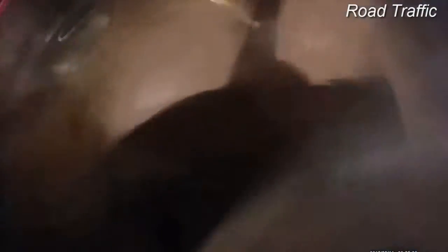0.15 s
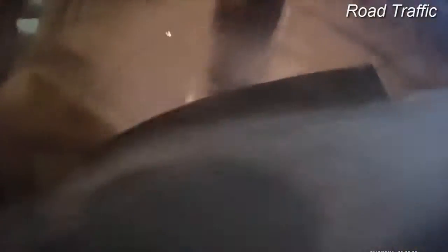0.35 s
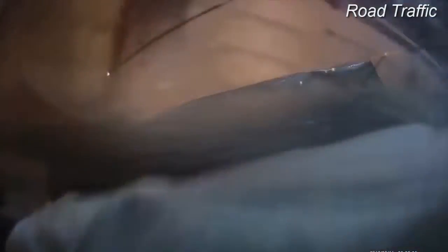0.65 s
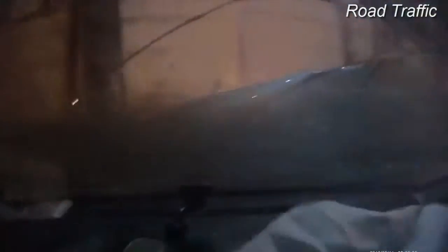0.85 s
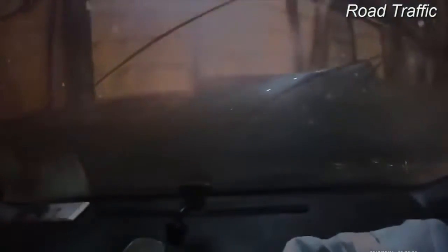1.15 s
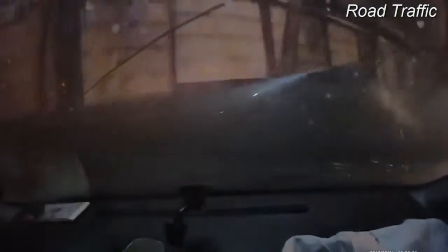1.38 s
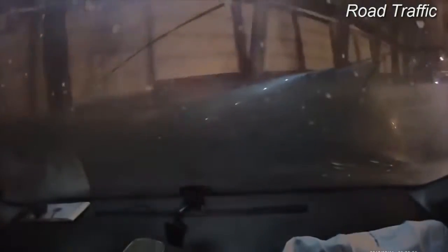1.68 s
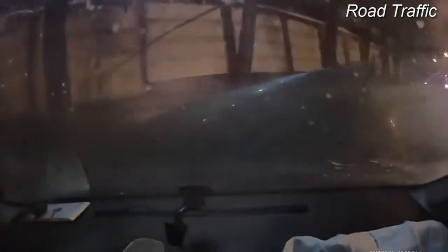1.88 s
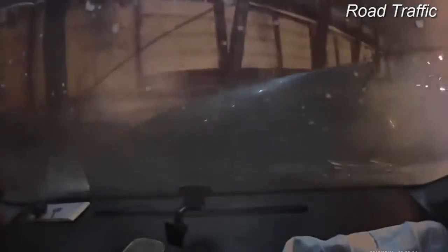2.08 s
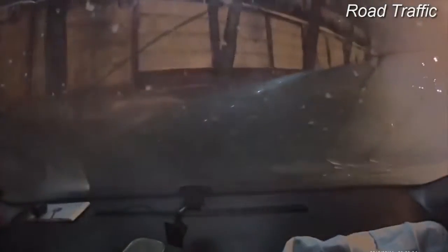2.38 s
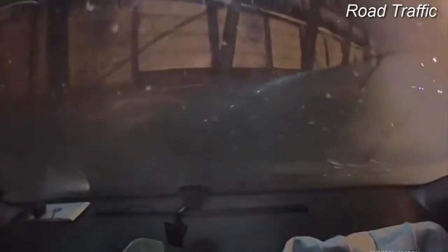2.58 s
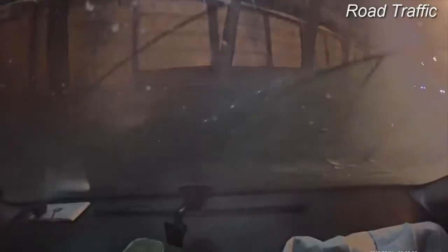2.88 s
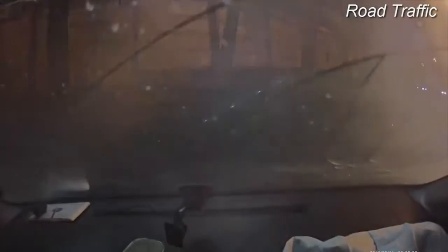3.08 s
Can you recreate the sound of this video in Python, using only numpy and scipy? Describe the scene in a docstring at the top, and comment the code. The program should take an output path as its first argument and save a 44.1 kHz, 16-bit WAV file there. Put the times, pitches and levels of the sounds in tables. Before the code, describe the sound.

A car slams into a wall with a heavy crunch and overloaded roar, debris rattling down to quiet hissing

```python
"""A car hits a wall, heard in the cabin: the shell booms and panels crumple (shaped noise, decaying sines);
glass crumbs and debris rain down (gritty noise, short pings) and loose parts strike (noise bursts).
The airbag blast (a noise roar) overloads the input; trim pieces knock (short sines) as the din dies.
A faint steam hiss (coloured noise) grows and brightens, the stalling engine shudders (mount resonances),
then little but the steam is left."""
import sys
import numpy as np
from scipy import signal
from scipy.fft import rfft, irfft, next_fast_len
from scipy.io import wavfile

SR = 44100
rng = np.random.default_rng(int(sys.argv[2]) if len(sys.argv) > 2 else 0)


def log_audio(samples):
    """Write samples as a 16-bit WAV file to the path given in sys.argv[1]."""
    # one column per channel
    frames = np.atleast_2d(samples).T
    # limit to full scale, then quantise
    limited = np.clip(frames, -1, 1)
    pcm = np.round(limited * 32767).astype(np.int16)
    wavfile.write(sys.argv[1], SR, pcm)


N = 143325


def amp(db):
    """Decibels to amplitude factor."""
    return 10 ** (np.asarray(db) / 20)


def unit(x):
    """Scale to rms 1."""
    return x / np.sqrt(np.mean(x ** 2) + 1e-20)


def curves(rows, dies_db_per_s=0):
    """Per-sample curve of each column after the time, falling steadily after the last row."""
    time_s, *columns = np.transpose(rows)
    t = np.arange(N) / SR
    fall_db = dies_db_per_s * np.clip(t - time_s[-1], 0, None)
    return [np.interp(t, time_s, column) - fall_db for column in columns]


def coloured(x, points):
    """Filter x by (frequency [Hz], gain [dB]) points, log-interpolated in frequency; rms 1."""
    m = next_fast_len(N + 8192)
    hz, db = np.transpose(points)
    bins_hz = np.fft.rfftfreq(m, 1 / SR)
    gain = amp(np.interp(np.log(bins_hz + 1), np.log(hz + 1), db, left=-90, right=-90))
    return unit(irfft(rfft(x, m) * gain, m)[:N])


def gritty(rate_per_s, spread_db, t60_s, bed):
    """Noise broken into small decaying impacts of random size, over a steady bed."""
    sizes = amp(spread_db * rng.exponential(size=N))
    ticks = (rng.random(N) < rate_per_s / SR) * sizes
    t = np.arange(SR // 10) / SR
    grains = unit(signal.fftconvolve(ticks, amp(-60 * t / t60_s))[:N])
    return (bed + grains) * rng.standard_normal(N)


def band(x, lo_hz, hi_hz):
    """Butterworth band-pass."""
    return signal.sosfilt(signal.butter(2, [lo_hz, hi_hz], "band", fs=SR, output="sos"), x)


def highpass(order, cutoff_hz):
    """Butterworth high-pass sections."""
    return signal.butter(order, cutoff_hz, "high", fs=SR, output="sos")


def add_at(out, start_s, sound):
    """Mix a sound into out at its start time."""
    out[round(start_s * SR):][:len(sound)] += sound


# shell shaking: (time [s], boom level [dB], rumble level [dB])
SHELL_SHAKE = [(0, -24, -24.5), (.1, -25.5, -20.5), (.3, -36.5, -36), (.6, -27, -34.5), (.75, -33, -34.5),
               (.82, -34.5, -40), (1.1, -41.5, -41.5), (1.45, -47.5, -44.5), (1.6, -40, -44),
               (1.95, -43, -47), (2.3, -35.5, -39), (2.68, -45, -48), (2.78, -45.5, -57.5),
               (3.25, -68, -64.5)]
# boom and rumble spectra: (frequency [Hz], relative density [dB per Hz])
BOOM_SPECTRUM = [(15, 3), (30, 5.5), (47, 8), (62, 7), (85, -20)]
RUMBLE_SPECTRUM = [(50, -26), (80, 8), (140, 6), (220, 3), (320, -13)]
# heavy blows to the shell: (time [s], peak level [dB])
SHELL_BLOWS = [(0.0142, -14), (0.093, -12), (.214, -19.5), (0.258, -23), (0.719, -19.5), (1.085, -29)]
# shell modes: (frequency [Hz], relative level [dB], t60 [s], swell [s])
SHELL_MODES = [(46.3, 0.5, 0.21, 0.015), (286, -9, .05, 0.0036)]


def shell():
    """The body shakes in its lowest resonance and rumbles above it; heavy blows set it ringing."""
    out, t = np.zeros(N + SR), np.arange(SR // 2) / SR
    ring = np.zeros(len(t))
    for hz, db, t60_s, swell_s in SHELL_MODES:
        envelope = amp(db - 60 * t / t60_s) * (1 - np.exp(-t / swell_s))
        ring += envelope * np.sin(2 * np.pi * hz * t)
    ring /= np.abs(ring).max()
    for s, db in SHELL_BLOWS:
        add_at(out, s, amp(db) * ring)
    boom_db, rumble_db = curves(SHELL_SHAKE)
    boom = amp(boom_db) * coloured(rng.standard_normal(N), BOOM_SPECTRUM)
    rumble = amp(rumble_db) * coloured(rng.standard_normal(N), RUMBLE_SPECTRUM)
    return out[:N] + boom + rumble


# crumpling and rattling panels, raining glass: (time [s], level [dB])
CRUMPLE_LEVEL = [(0, -33.5), (.036, -32), (.07, -19), (.3, -34.5), (.46, -34), (.5, -26.5), (.58, -35),
                 (.63, -25.5), (.72, -35.5), (.8, -37.5), (1.3, -49), (2.4, -49.5), (2.75, -57)]
GLASS_RAIN_LEVEL = [(.03, -57.5), (.1, -32.5), (.3, -45.5), (.58, -54), (.7, -39), (.8, -52), (1.2, -61.5),
                    (1.5, -70.5)]
# their spectra: (frequency [Hz], relative density [dB per Hz])
CRUNCH_SPECTRUM = [(180, -19), (330, 3.5), (600, -1.5), (1200, -5), (1550, -7.5), (2000, -29), (3000, -30)]
SHOWER_SPECTRUM = [(1300, -21), (2300, 4.5), (3200, -5.5), (4500, -0.5), (6000, -6.5), (9000, -8.5),
                   (16000, -20)]
DIES_DB_PER_S = 17  # after the last level row


def debris():
    """Many small impacts: crumpling plastic and sheet metal below, glass crumbs above."""
    crunch_db, = curves(CRUMPLE_LEVEL, DIES_DB_PER_S)
    shower_db, = curves(GLASS_RAIN_LEVEL, DIES_DB_PER_S)
    crunch = coloured(gritty(rate_per_s=80, spread_db=1.7, t60_s=0.039, bed=1.0), CRUNCH_SPECTRUM)
    shower = coloured(gritty(rate_per_s=700, spread_db=4.5, t60_s=0.016, bed=0.68), SHOWER_SPECTRUM)
    return amp(crunch_db) * crunch + amp(shower_db) * shower


# loose parts striking:
# (time [s], level [dB], thud gain over it [dB], sparkle gain over it [dB], crack and sparkle t60 [s])
PART_HITS = [(0.047, -18, -20, -13, 0.28), (0.4147, -29.5, 12, -21, 0.046), (0.435, -15, -7.5, -23, 0.02),
             (0.511, -41, 17, -3, 0.16), (0.5485, -30, 11, -5, 0.015), (0.6145, -24.5, 2.5, 2, 0.067),
             (0.645, -24.5, -8, -5.5, 0.12), (0.6941, -31, 10, 7, 0.053), (0.73, -29, 7, -4, 0.062),
             (0.843, -28, -17, -5, 0.1), (1.0031, -21.5, -17, -7, 0.086), (1.0382, -46, 19.5, -15, 0.033),
             (1.0998, -36, 3.5, -3.5, 0.12), (1.2606, -22, -4, -23, 0.055),
             (1.3189, -29.5, 4, -13.5, 0.073), (1.4071, -52.5, 12.5, 2.5, 0.22),
             (1.5497, -26.5, 9.5, -27, 0.035), (1.5604, -30.5, 11, -21, 0.016),
             (1.5694, -33, 12, -25, 0.039), (1.6125, -39, 1.5, -19, 0.16), (1.849, -37, -14, -5.5, 0.054)]
CONTACT, THUD_T60_RATIO = 3.4, 1.59


def parts():
    """Each strike: a hard first contact, then dying noise, sounding as crack, thud and sparkle."""
    out, t = np.zeros(N + SR), np.arange(SR // 5) / SR
    contact = CONTACT * (t == 0) * [[1], [.3], [2]]  # crack, sparkle, thud
    for s, db, thud_db, sparkle_db, t60_s in PART_HITS:
        a, b, c = rng.standard_normal((3, len(t))) * amp(-60 * t / t60_s) + contact
        crack = 0.68 * band(a, 1410, 2820)
        sparkle = amp(sparkle_db) * (band(b, 3580, 6350) + 0.33 * band(b, 5500, 10560))
        slower_decay_db = 60 * t / t60_s * (1 - 1 / THUD_T60_RATIO)
        thud = 3 * band(c * amp(thud_db + slower_decay_db), 328, 1184)
        add_at(out, s, amp(db) * (crack + sparkle + thud))
    return out[:N]


# glass crumbs pinging: (time [s], level [dB], ring frequency [Hz])
GLASS_PINGS = [(0.061, -19.5, 4370), (0.0842, -23, 4680), (0.232, -22.5, 7500), (0.307, -27.5, 4600),
               (0.323, -33, 5160), (1.166, -40.5, 5450), (1.2276, -36.5, 4640), (1.7677, -40.5, 4400)]
PING_T60_S, PING_WIDTH_RATIO = 0.026, 1.08


def glass():
    """A bright noise tick and a narrow-band short ring for each crumb."""
    out, t = np.zeros(N + SR), np.arange(SR // 10) / SR
    for s, db, hz in GLASS_PINGS:
        a, b = rng.standard_normal((2, len(t))) * amp(-60 * t / PING_T60_S)
        tick = 0.4 * band(a, 2300, 9500)
        ring = 2.0 * band(b, hz / PING_WIDTH_RATIO, hz * PING_WIDTH_RATIO)
        add_at(out, s, amp(db) * (tick + ring))
    return out[:N]


# gas roar spectrum: (frequency [Hz], relative density [dB per Hz])
BLAST_SPECTRUM = [(100, -12), (400, -1), (650, -0.5), (1100, 4.5), (1500, -5), (2600, -7.5), (5000, -13.5),
                  (16000, -30.5)]
BLAST_START_S, BLAST_ATTACK_S, BLAST_HOLD_S = 0.1085, 0.013, 0.072
BLAST_DB, BLAST_FALL_DB_PER_S = -2.5, 678  # level before the deepening


def airbag():
    """A roar of gas: fast attack, hold, steep fall; it deepens as the bag fills."""
    t = np.arange(N) / SR - BLAST_START_S
    fall_db = BLAST_FALL_DB_PER_S * np.clip(t - BLAST_ATTACK_S - BLAST_HOLD_S, 0, None)
    roar = coloured(rng.standard_normal(N), BLAST_SPECTRUM)
    fill = np.clip(t / BLAST_HOLD_S - .45, 0, 1)
    roar = roar + 1.67 * fill * band(roar, 585, 795)
    attack = np.clip(t / BLAST_ATTACK_S, 0, 1) ** 2
    return attack * amp(BLAST_DB - fall_db) * roar


# hard trim pieces struck: (time [s], level [dB], frequency [Hz])
TRIM_KNOCKS = [(0.269, -22.5, 2220), (0.377, -21.5, 1150), (0.413, -22, 1720), (.4345, -17.5, 1590),
               (0.484, -22.5, 870), (.602, -25, 610), (0.873, -23.5, 1180), (1.006, -17, 1350),
               (1.322, -21, 1110), (1.552, -27, 2880), (1.634, -31, 1100), (1.754, -31.5, 1280),
               (1.853, -38, 1290), (1.896, -39.5, 1430), (2.197, -35, 1380), (2.881, -35, 1050)]
TRIM_T60_S, TRIM_RISE_S = 0.02, 0.00042


def trim():
    """A short knock for each piece: one quickly damped sine."""
    out, t = np.zeros(N + SR), np.arange(SR // 10) / SR
    rise = 1 - np.exp(-t / TRIM_RISE_S)
    for s, db, hz in TRIM_KNOCKS:
        add_at(out, s, amp(db - 60 * t / TRIM_T60_S) * rise * np.sin(2 * np.pi * hz * t))
    return out[:N]


# steam: (time [s], level [dB], treble gain [dB])
STEAM_CURVE = [(.8, -60, -16), (2.1, -55.5, -3), (3.25, -53, 2)]
# hiss through the dashboard: (frequency [Hz], relative density [dB per Hz])
STEAM_SPECTRUM = [(250, -12.5), (600, -2.5), (1100, -3.5), (1500, -8), (1950, -18.5), (2350, -5),
                  (2700, -11), (3180, -19.5), (3320, -14.5), (3460, -21), (4420, -16.5), (4570, -10),
                  (4760, -23), (5400, -23), (6300, -17), (6900, -26.5), (7900, -21.5), (8500, -31),
                  (9300, -25.5), (10300, -32), (11300, -27.5), (12500, -35), (16000, -37)]


def steam():
    """A smooth hiss through the dashboard's resonances, brightening as it builds."""
    level_db, treble_db = curves(STEAM_CURVE)
    hiss = coloured(rng.standard_normal(N), STEAM_SPECTRUM)
    treble = signal.sosfiltfilt(highpass(2, 7500), hiss)
    return amp(level_db) * (hiss + (amp(treble_db) - 1) * treble)


# the engine's last shudders: (time [s], level [dB])
ENGINE_SHUDDERS = [(1.998, -34), (2.197, -34.5), (2.239, -32), (2.325, -31.5), (2.407, -30.5),
                   (2.469, -30.5), (2.63, -39.5), (2.718, -44), (2.802, -39)]
# mount and dashboard modes: (mean frequency [Hz], mean relative level [dB], t60 [s])
MOUNT_MODES = [(136.5, 3.5, 0.067), (230.4, 4, 0.057), (423, 1, 0.057), (610, -5.5, 0.08),
               (1093, -0.5, 0.042)]


def engine():
    """Each late firing jolts the mounts and dashboard, whose modes vary a little per jolt."""
    out, t = np.zeros(N + SR), np.arange(SR // 4) / SR
    rise = 1 - np.exp(-t / 0.0071)
    for s, db in ENGINE_SHUDDERS:
        ring = np.zeros(len(t))
        for mean_hz, mean_db, t60_s in MOUNT_MODES:
            mode_db = mean_db + rng.normal(0, 2.3)
            hz = mean_hz * rng.normal(1, 0.042)
            ring += amp(mode_db - 60 * t / t60_s) * np.sin(2 * np.pi * hz * t)
        add_at(out, s, amp(db) * ring * rise)
    return out[:N]


def scene():
    """Sum of all sources, one channel."""
    crash = shell() + debris() + parts() + glass() + airbag() + trim()
    return (crash + steam() + engine())[None]


CLIP_TOP, CLIP_HARDNESS = 0.15, 26  # amplitude ceiling, knee exponent
COUPLING_HZ, TOP_HZ = 11, 15746


def record(dry):
    """The input clips hard, then the band is limited at both ends."""
    x = dry / (1 + np.abs(dry / CLIP_TOP) ** CLIP_HARDNESS) ** (1 / CLIP_HARDNESS)
    x = signal.sosfilt(highpass(1, COUPLING_HZ), x)
    m = next_fast_len(N + 8192)
    passed = np.fft.rfftfreq(m, 1 / SR) < TOP_HZ
    return irfft(rfft(x, m) * passed, m)[:, :N]


dry = scene()
out = record(dry)
log_audio(out)
```